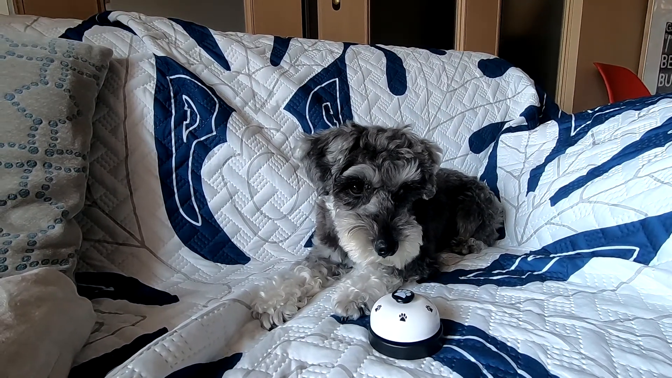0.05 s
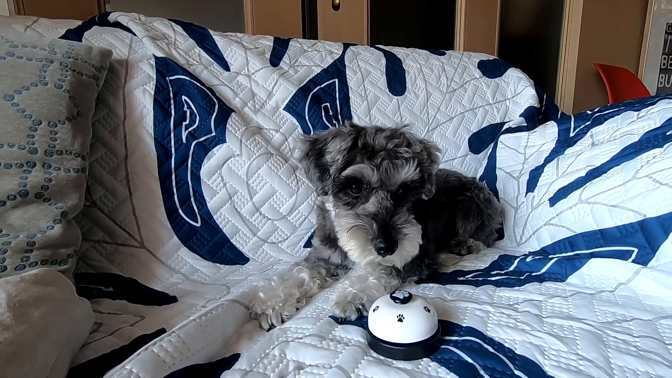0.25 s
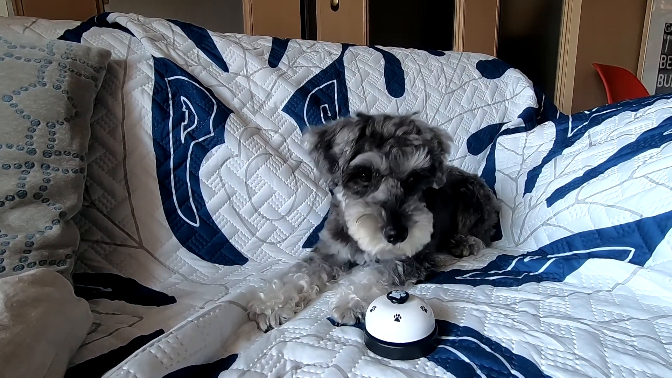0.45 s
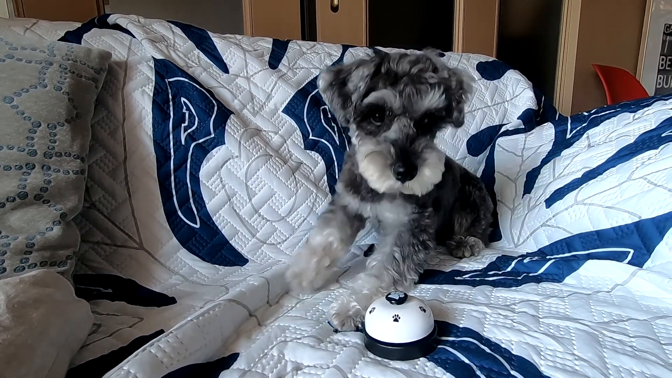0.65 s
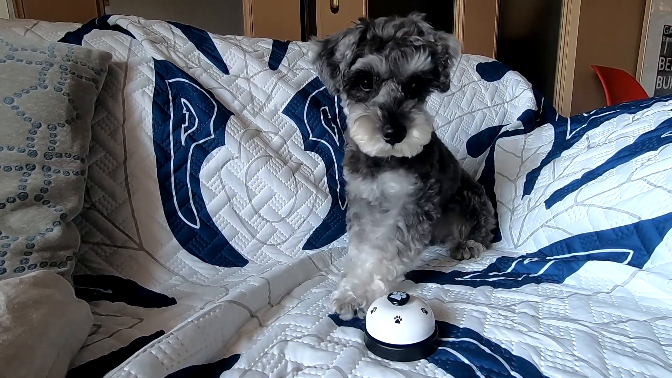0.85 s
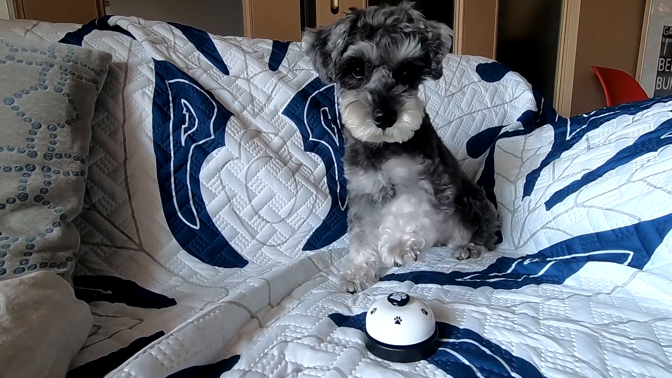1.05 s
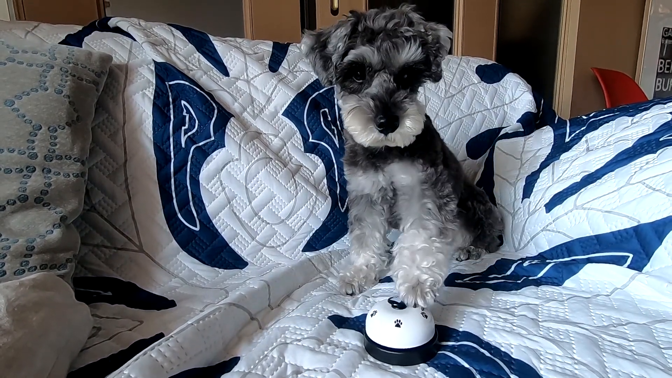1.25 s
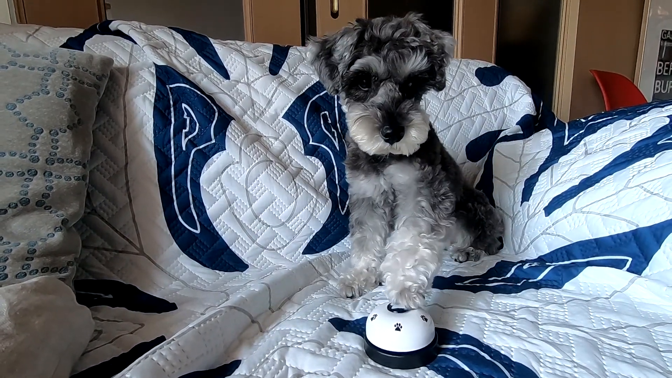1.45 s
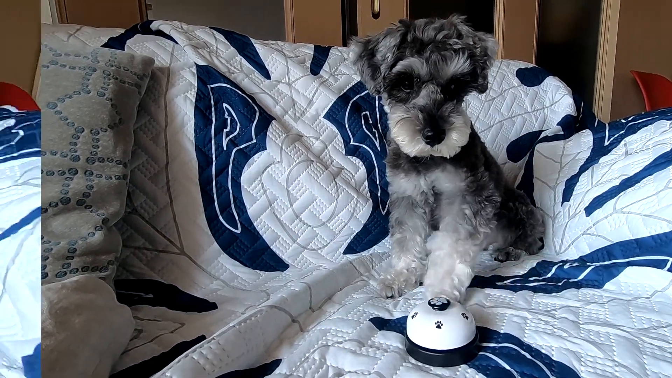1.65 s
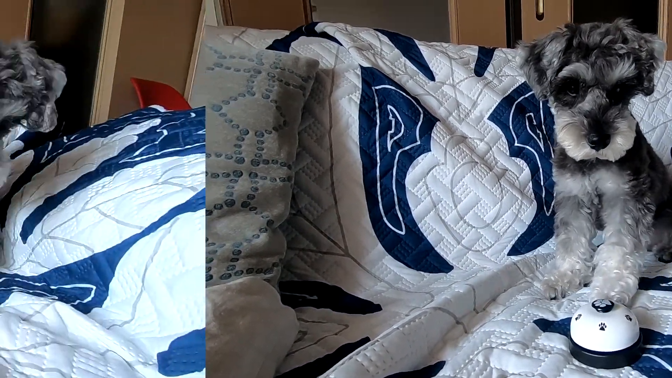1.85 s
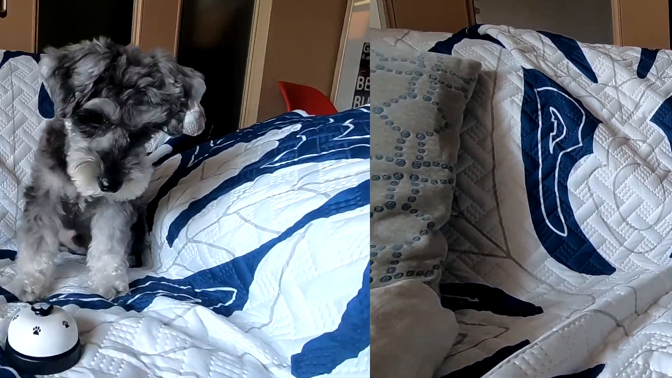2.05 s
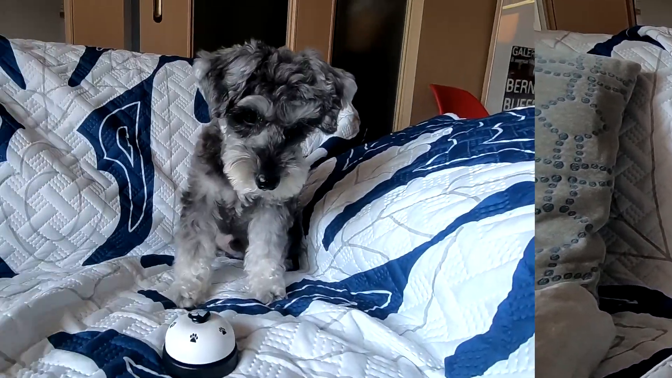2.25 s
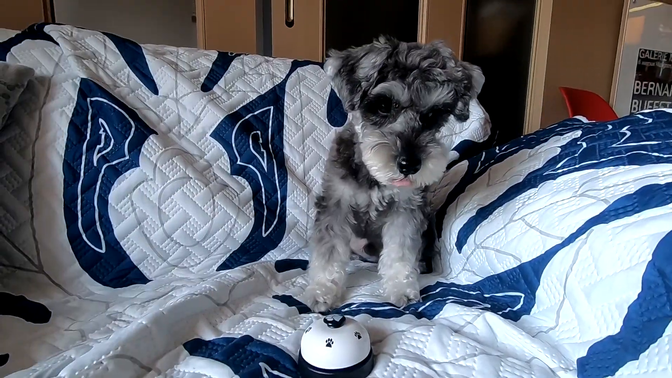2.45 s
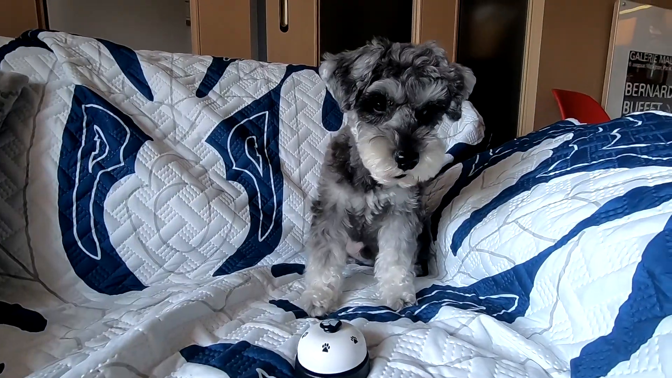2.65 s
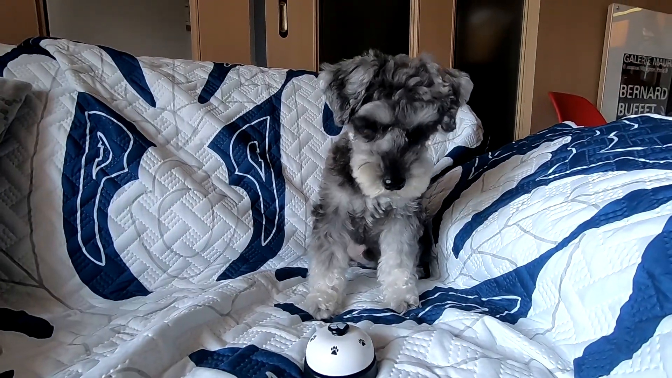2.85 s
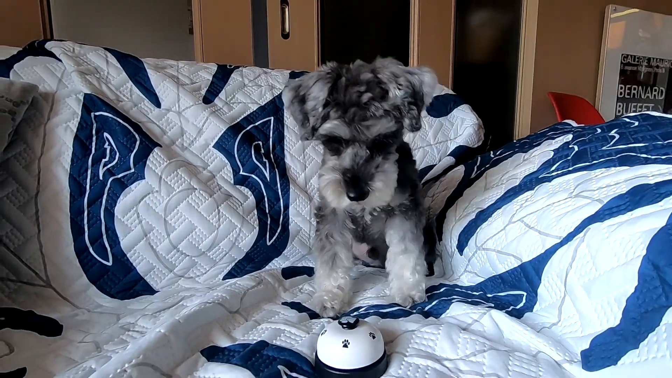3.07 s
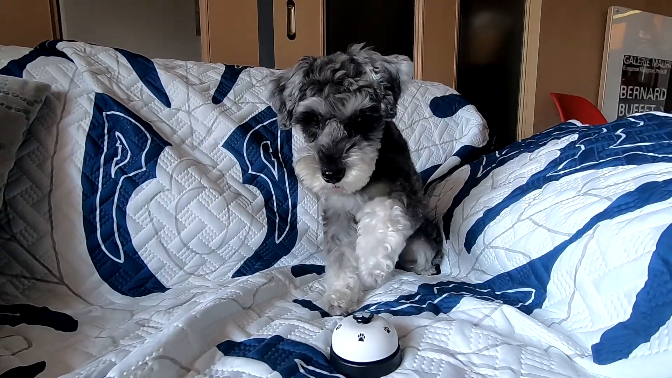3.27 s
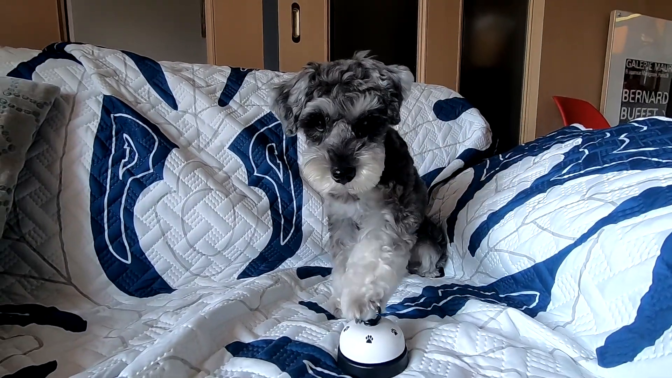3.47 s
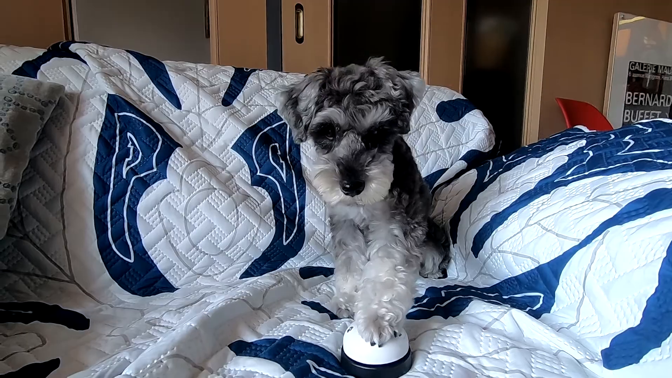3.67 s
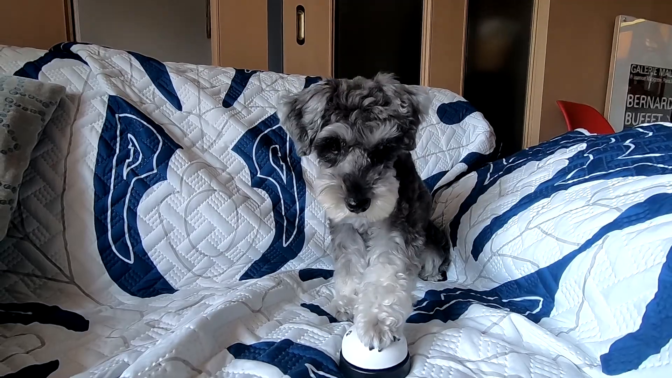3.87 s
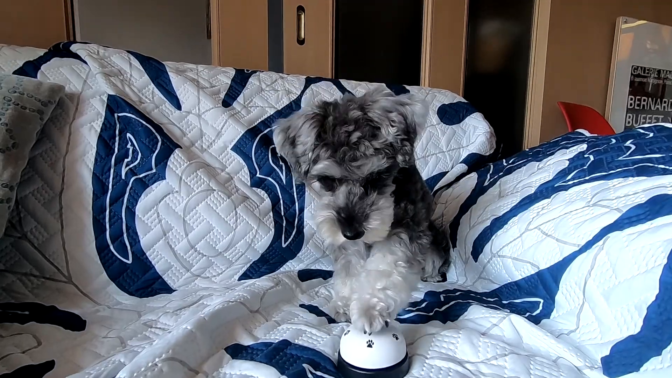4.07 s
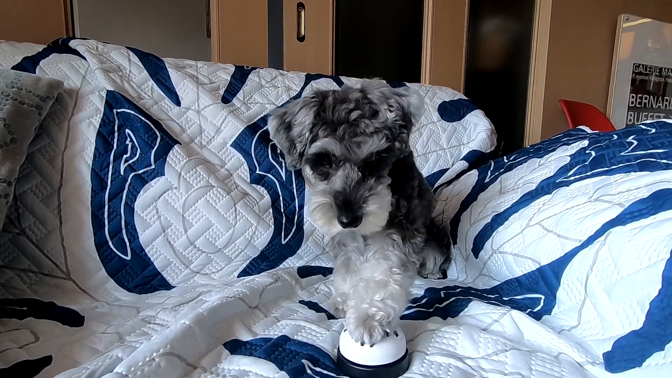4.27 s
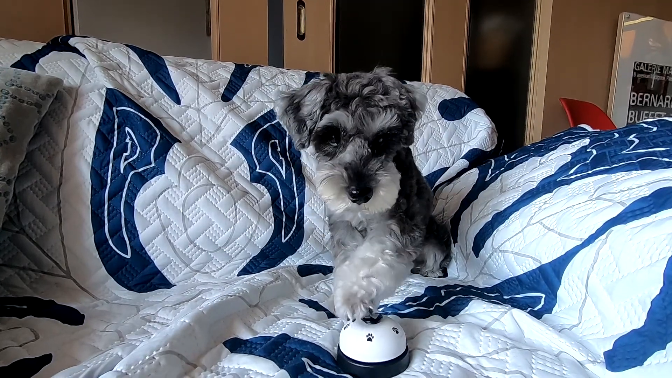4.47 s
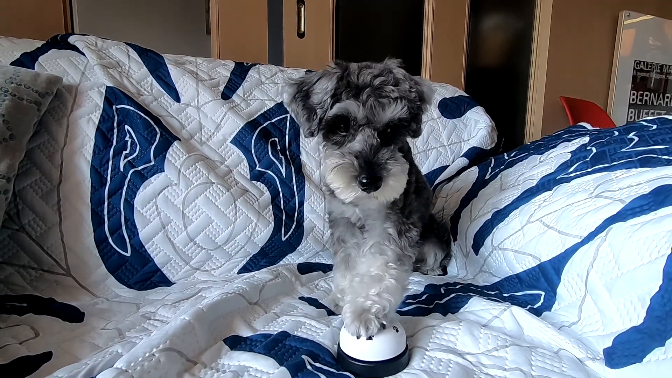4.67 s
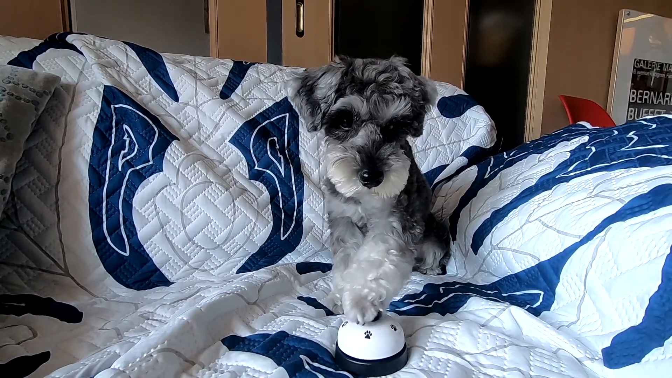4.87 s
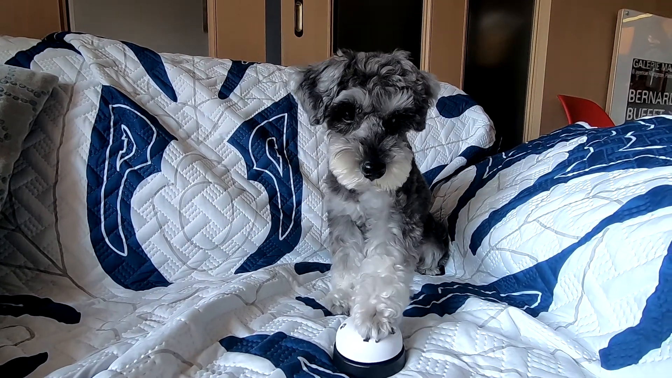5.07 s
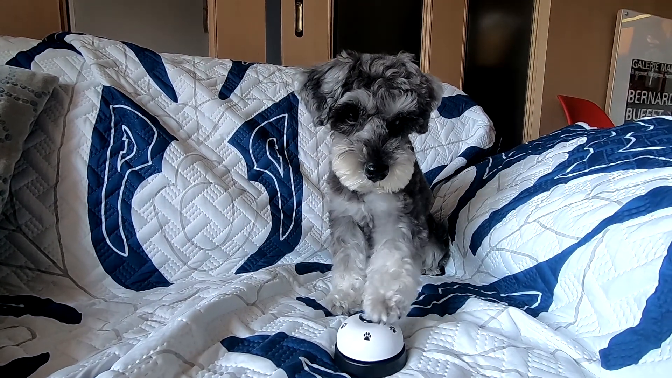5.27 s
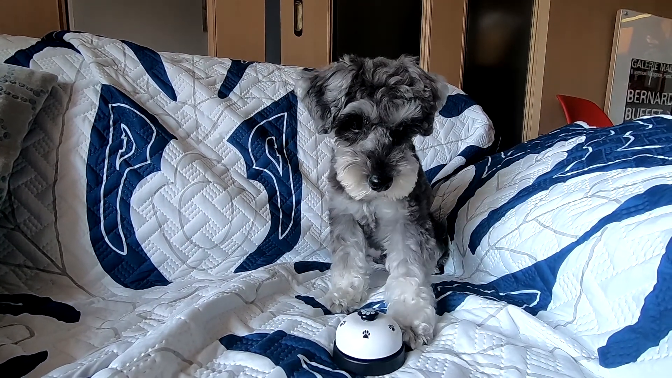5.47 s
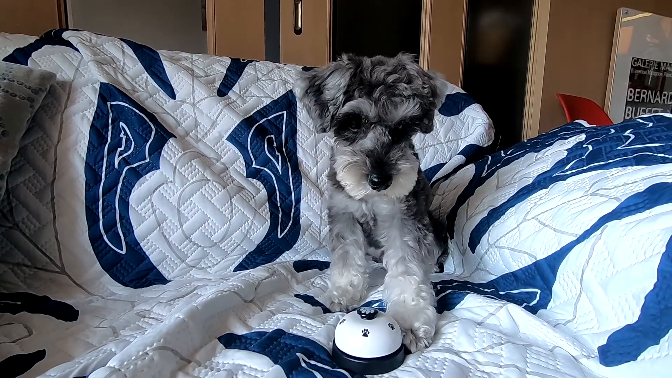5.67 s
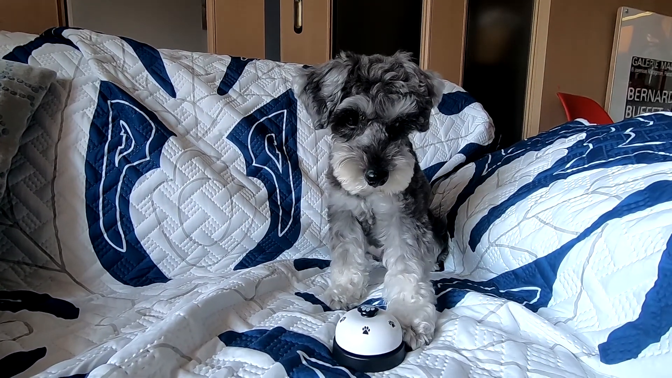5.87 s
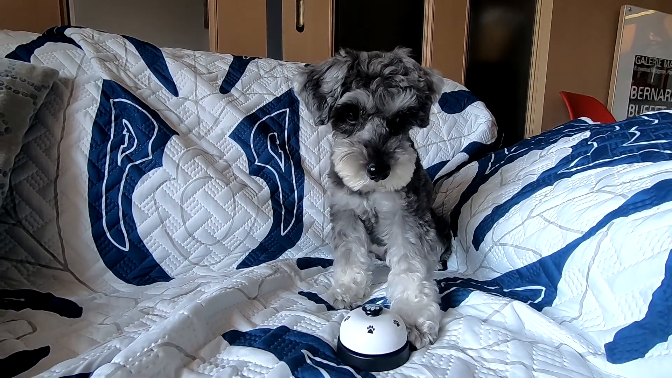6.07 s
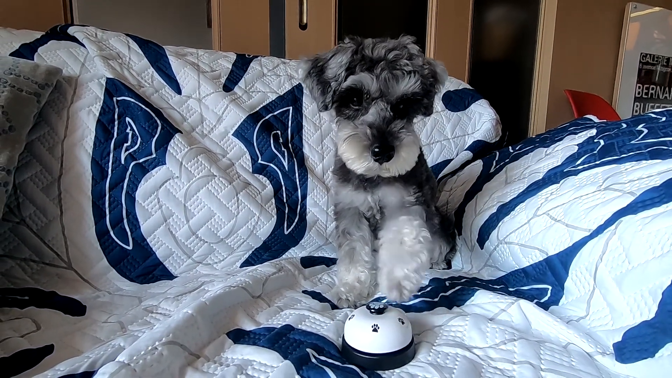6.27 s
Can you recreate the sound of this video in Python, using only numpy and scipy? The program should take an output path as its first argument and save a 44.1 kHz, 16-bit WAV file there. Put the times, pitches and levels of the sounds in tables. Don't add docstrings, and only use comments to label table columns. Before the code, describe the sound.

A quiet furnished room hums low, with faint hiss and soft air rumbles. For the first second, a dog's paw rustles over quilted cloth, with tiny claw ticks, a soft cushion thud near 0.4 s and an almost inaudible earlier ring. At about 1.2 s the plunger scrapes and clicks and a small steel bell gives a high, clear ding, unevenly damped by the paw. A very faint distant bird chirps twice near 1.7-1.9 s. A weaker ding at 2.1 s is choked and ends around 2.5 s as the scene changes. Light rustles and thuds follow. Brighter, firmer dings come at 3.6, 4.2, 4.6 and 5.0 s, each with plunger rattle and soft padded impacts. At 5.44 s the released plunger snaps sharply with claw ticks and a thud; the last ring thins away until 6.3 s amid faint rustling. Close stereo microphone, very short echoes.

```python
import sys
import numpy as np
from scipy import signal
from scipy.fft import rfft, irfft, next_fast_len
from scipy.io import wavfile

SR = 44100
rng = np.random.default_rng(int(sys.argv[2]) if len(sys.argv) > 2 else 0)


def store_wav(level_fs):
    pcm = np.round(np.clip(np.atleast_2d(level_fs), -1, 1) * 32767)
    wavfile.write(sys.argv[1], SR, pcm.T.astype(np.int16))


def rack_gain(trim_db):
    fader = np.asarray(trim_db, float)
    return 10 ** (fader / 20)


N = 279020
SECOND_TAKE_S = 2.5

# freq_hz, level_db_per_hz
RUMBLE_SPECTRUM = [(11, -31), (18, -1.5), (40, 1), (56, -3), (75, -17), (110, -15.5), (140, -49.5),
                   (240, -120)]
DRONE_SPECTRUM = [(71, -50), (120, -17), (140, 1), (160, 1.5), (202, -1.5), (240, -9.5), (320, -45.5),
                  (550, -120)]
HISS_SPECTRUM = [(150, -33.5), (260, -0.5), (720, -7.5), (1040, -15), (1560, -14), (2280, -25),
                 (6590, -37.5), (15000, -51.5)]
# freq_hz, level_db_per_hz
CLOTH_SPECTRUM = [(400, -12), (900, -0.5), (2020, 0), (5500, -11), (8400, -20), (10200, -18),
                  (12500, -28.5), (15000, -50)]
# freq_hz, likeness_0_to_1
LIKENESS = [(60, 0.75), (180, 0.79), (540, 0.23), (1630, 0), (4910, 0.39), (14800, -0.0)]
# time_s, level_db
HUM_LEVEL = [(0.0, -58.5), (1.62, -60), (2.2, -67), (2.8, -58.5), (4.12, -61.5), (6.33, -61.5)]
# centre_s, half_length_s, level_db
GUSTS = [(.05, 0.11, -56.5), (.45, 0.076, -59.5), (.85, 0.19, -53), (1.37, 0.084, -51), (1.74, 0.082, -61),
         (2.6, 0.076, -64), (2.93, 0.031, -51), (3.6, 0.73, -69.5), (4.68, 0.045, -55.5),
         (4.98, 0.026, -56), (5.26, 0.032, -63), (5.5, 0.039, -55.5), (5.95, 0.07, -55.5)]

# freq_hz, attack_s, take1_left_right_db, take1_left_lead_rad, take2_left_right_db, take2_left_lead_rad
PRIME = (3733.5, .004, 0, -.3, 0, -.12)
HUM = (1417.6, .006, -7.5, .62, -4.0, -.88)
HUM_TWIN = (1473.55, .006, -3.5, -.55, -1.5, -.5)
THIRD = (6614.5, .008, 0, 0, 0, 0)
FOURTH = (9959.5, .003, 0, 0, 0, 0)
FIFTH = (14040, .003, 3.0, 1.4, -3.5, 1.8)
# start_s, twin_over_hum_db, twin_change_db_per_s, beat_start_turns, fifth_under_fourth_db
BLOWS = [
    (0, 2.5, 0.5, 0.27, -25),
    (1.1734, 5, -5.5, .65, -16),
    (2.1348, 7.5, -8, 0.78, -15.5),
    (3.6168, -29.5, 1.5, 0.12, -15.5),
    (4.187, -24, -4, 0.091, -17),
    (4.5892, -29.5, -7.5, .1, -16.5),
    (4.97, -29, -9.5, .1, -16.5),
]
# level_db, decay_db_per_s, grip_after_s, grip_loss_db, grip_time_s
GRIPS = [(-72.5, 3.5, 0.6, 2.5, 0.039), (-46, 17, .45, 0, 0.063), (-58, 55, .33, 23, 0.028),
         (-36.5, 31, 0.3, 33, 0.071), (-40, 16.5, 0.16, 10.5, 0.019), (-41, 21.5, 0.17, 25.5, 0.039),
         (-38.5, 17, 0.23, 12, 0.019)]
# time_s, left_db, right_db
EARLIER_RING = [(0, -90, -84), (.2, -95, -91), (1.17, -120, -120)]
FIRST_RING = [(1.185, -30.5, -26.1), (1.245, -28, -28.8), (1.3, -31.5, -33), (1.461, -46.0, -43.0),
              (1.533, -40.9, -43.0), (1.671, -47.7, -45.3), (1.89, -56, -56), (1.971, -65.3, -59.2),
              (2.109, -65.3, -65.5)]
MIDDLE_RINGS = [
    [(2.147, -34.2, -31.8), (2.195, -33.8, -36.3), (2.249, -37.5, -43.7), (2.303, -46.5, -51.2),
     (2.393, -58.5, -53.8), (2.429, -60.9, -59.3), (2.465, -68.6, -70.7), (2.483, -78.8, -82.1)],
    [(3.628, -25.8, -24.2), (3.652, -24.2, -22.1), (3.7, -25.0, -23.4), (3.754, -28.3, -26.4),
     (3.826, -43.4, -41.7), (3.856, -47.4, -45.6), (4.132, -61.1, -60.4), (4.156, -60.5, -60.5)],
    [(4.199, -25.8, -24.5), (4.223, -23.5, -22.3), (4.295, -25.8, -24.6), (4.391, -36.3, -36.3),
     (4.439, -38.9, -38.9), (4.493, -37.8, -36.8), (4.541, -42.6, -41.8), (4.565, -42.0, -41.8)],
    [(4.601, -25.2, -24.7), (4.637, -24.6, -23.6), (4.691, -27.3, -26.5), (4.715, -29.4, -28.6),
     (4.793, -38.7, -38.7), (4.859, -43.4, -43.6), (4.937, -45.7, -45.0), (4.949, -45.2, -44.3)],
]
LAST_RING = [(4.982, -26.9, -26.5), (5.006, -25, -24.6), (5.078, -26.4, -25.9), (5.216, -46.0, -46.2),
             (5.36, -43.3, -43.4), (5.402, -51.5, -51.6), (5.54, -50.8, -50.2), (5.786, -67.0, -65.5),
             (6.27, -79, -79)]
# time_s, left_db, right_db, left_lead_rad
THIRDS = [
    [(0, -120, -120, 0)],
    [(1.185, -39.9, -25.1, 1.0), (1.221, -33.4, -22.9, 1.0), (1.305, -42.5, -29.5, 1.5),
     (1.431, -69.1, -42.4, 0.6), (1.515, -65.4, -46.2, -0.4), (1.731, -73.9, -59.5, 0.8),
     (1.881, -95.0, -69.8, -0.4), (1.965, -95.0, -78.4, 5.7), (2.109, -91.7, -85.8, 6.5)],
    [(2.147, -49.1, -39.4, -1.1), (2.159, -54.7, -40.1, -0.9), (2.177, -52.5, -41.5, 0.3),
     (2.237, -59.9, -46.4, 0.3), (2.261, -67.1, -49.8, 0.3), (2.297, -72.2, -55.9, 0.1),
     (2.399, -80.6, -66.0, -0.8), (2.447, -89.4, -76.6, -0.8), (2.471, -95.0, -87.9, -0.1)],
    [(3.628, -48.0, -42.3, 2.6), (3.646, -41.9, -37.0, 3.1), (3.7, -43.3, -39.5, 4.7),
     (3.766, -47.6, -47.2, 4.5), (3.802, -53.3, -63.5, 5.6), (3.814, -54.9, -62.1, 6.9),
     (3.94, -67.0, -73.9, 6.1), (3.97, -69.8, -81.6, 8.6), (4.156, -74.9, -71.1, 11.3)],
    [(4.199, -39.9, -40.9, -2.4), (4.211, -37.9, -35.8, -2.7), (4.289, -47.3, -39.3, -2.0),
     (4.319, -60.2, -41.7, -1.7), (4.331, -79.6, -43.1, -3.5), (4.355, -61.9, -46.2, 0.8),
     (4.487, -56.5, -60.8, 0.9), (4.535, -61.1, -75.3, -1.3), (4.565, -61.3, -67.8, -2.1)],
    [(4.601, -36.4, -36.1, -2.7), (4.613, -35.9, -32.0, -3.0), (4.625, -39.5, -36.0, -3.0),
     (4.679, -42.9, -40.4, -2.9), (4.691, -50.3, -40.5, -2.9), (4.787, -63.5, -49.2, -4.6),
     (4.871, -59.4, -59.7, -5.8), (4.919, -61.0, -64.7, -6.0), (4.949, -60.6, -64.4, -6.0)],
    [(4.982, -37.3, -43.7, 2.7), (4.994, -35.7, -36.0, 2.8), (5.042, -39.7, -37.1, 3.5),
     (5.114, -55.8, -43.3, 3.3), (5.15, -80.6, -48.2, 3.8), (5.162, -66.3, -49.8, 5.6),
     (5.36, -63.2, -64.7, 5.4), (5.624, -87.0, -77.4, 2.1), (5.702, -89.7, -86.6, 0.7)],
]
FOURTHS = [
    [(0, -120, -120, 0)],
    [(1.185, -45.1, -34.5, -1.8), (1.215, -36.7, -40.5, -1.4), (1.239, -39.2, -48.8, -0.8),
     (1.263, -45.3, -46.1, -0.8), (1.311, -49.7, -53.5, -1.2), (1.353, -63.8, -64.9, -0.3),
     (1.569, -92.0, -85.2, -1.5)],
    [(2.147, -56.0, -48.4, -0.8), (2.159, -51.4, -52.9, -0.8), (2.177, -50.6, -58.2, -0.7),
     (2.189, -53.2, -59.1, -0.2), (2.243, -60.1, -61.1, -0.6), (2.285, -69.6, -74.0, -0.0),
     (2.315, -77.8, -78.3, 0.1)],
    [(3.628, -48.5, -37.4, -1.5), (3.647, -48.5, -37, 0), (3.69, -45.5, -51, 3.1), (3.722, -53, -50, 4.1),
     (3.75, -63, -55, 6.3), (3.81, -70, -66, 9.4), (3.89, -80, -92, 15.5), (3.95, -95, -87, 15)],
    [(4.199, -44.1, -36.5, -1.9), (4.217, -41.9, -40.4, -1.3), (4.259, -52.5, -48.7, -1.7),
     (4.301, -56.0, -50.4, -2.0), (4.355, -68.8, -66.5, -1.4), (4.547, -92.0, -90.0, -2.0),
     (4.565, -92.0, -82.0, -1.8)],
    [(4.601, -40.5, -33.9, -1.7), (4.619, -35.9, -34.3, -1.7), (4.667, -45.1, -45.0, -1.6),
     (4.709, -50.8, -46.2, -2.0), (4.847, -77.9, -73.1, -2.3), (4.895, -83.1, -74.4, -1.6),
     (4.949, -91.2, -85.4, -2.3)],
    [(4.982, -46.3, -37.3, -1.5), (5.006, -42.5, -40.4, -1.7), (5.036, -50.6, -51.0, -1.6),
     (5.096, -69.1, -54.7, -1.6), (5.132, -77.6, -73.0, -1.2), (5.156, -77.8, -67.9, -0.8),
     (5.294, -92.0, -82.9, -1.8)],
]

# start_s, peak_db, pitch_hz
CLAWS = [(.3115, -67, 8430), (0.4098, -75, 9440), (.4699, -67, 3940), (.5947, -63, 4500),
         (.7423, -66, 4670), (.754, -67, 4700), (.8371, -80, 10020), (0.8491, -65, 4500), (.87, -61, 4690),
         (.88, -66, 4620), (.8805, -84, 11000), (1.2001, -40.5, 11200), (1.201, -52, 13070),
         (1.586, -68.5, 12280), (1.594, -58.5, 10820), (1.5942, -58.5, 7370), (1.604, -61, 10480),
         (2.326, -62, 11200), (2.338, -64, 11040), (2.372, -66.5, 7500), (2.62, -73, 4570),
         (2.6396, -75, 4550), (2.6664, -70, 4120), (3.2634, -59, 4650), (3.28, -69, 4460),
         (3.3047, -62, 6290), (3.3258, -62, 1870), (3.327, -71, 9670), (3.3315, -62, 4930),
         (3.369, -59.5, 1650), (3.391, -57, 1470), (3.3888, -67.5, 5500), (3.597, -43.5, 2997),
         (3.6102, -49.5, 11540), (3.611, -32.5, 5090), (3.6505, -44.5, 4990), (4.176, -48, 2225),
         (4.1822, -31, 5040), (4.1905, -41.5, 5140), (4.585, -33, 4994), (4.5927, -40.5, 5270),
         (4.5858, -54, 11450), (4.612, -44.5, 4954), (4.9652, -36, 4865), (2.5025, -53, 1510),
         (5.33, -55, 5100), (5.356, -69, 9000), (5.363, -62.5, 10070), (5.413, -52, 1510),
         (5.4166, -64, 5060), (5.4413, -39, 6040), (5.441, -43.5, 9760), (5.4412, -39, 2204),
         (5.45, -49, 7950), (5.4522, -46, 9980), (5.453, -50, 6060), (5.462, -49.5, 7750)]
# start_s, peak_db, pitch_hz
THUDS = [(0.398, -48, 162), (1.179, -39.5, 237), (1.206, -39.5, 176), (2.499, -64, 154),
         (2.923, -46.5, 149), (3.9399, -39.5, 152), (4.191, -43.5, 162.7), (4.598, -40, 175.7),
         (4.982, -38.5, 151), (5.447, -39, 201), (5.4555, -37.5, 119)]
# centre_s, half_length_s, level_db, brightness_db
STROKES = [(0.438, 0.04, -71.5, -15), (0.555, 0.062, -68.5, -1), (0.76, 0.032, -73.5, 1),
           (0.862, 0.028, -70, 0), (1.06, 0.11, -81.5, -4), (1.613, 0.022, -80, 17), (2.36, 0.038, -76, 11),
           (2.515, .04, -78.5, -11), (2.666, .05, -77.5, 6), (2.957, 0.029, -80.5, -9),
           (3.03, 0.055, -83, 7), (3.243, 0.051, -70.5, -12), (3.336, 0.024, -77.5, 14.5),
           (3.405, 0.034, -76.5, -5), (3.52, 0.063, -77.5, -11), (3.963, .03, -81, -1),
           (4.13, 0.042, -78, -3), (4.48, 0.023, -76, 3), (4.58, .015, -72, -6), (5.237, .025, -71.5, -5),
           (5.365, .035, -68, 6.5), (5.436, .012, -61, 3), (5.517, 0.058, -74, 10),
           (6.25, 0.05, -73, -17.5)]
# centre_s, half_length_s, level_db
SHIFTS = [(.42, 0.043, -68.5), (1.5, .08, -71), (2.48, 0.05, -68), (2.94, 0.026, -81), (3.3, 0.058, -70),
          (3.5, 0.09, -72.5), (6.24, 0.028, -63.5)]

# freq_hz, level_db, t60_s
BODY = [(1592, -1, 0.0077), (1740, -12.5, 0.014), (2267, -11.5, 0.0086), (2615, -2.5, 0.011),
        (3130, -2.5, 0.01), (3336, -1, 0.013)]
SHELL = [(4000, -4, 0.013), (4893, -1, 0.0096), (5500, -5.5, .008), (6290, -7, .01)]
TICK = [(7230, -2, 0.0066), (7480, 0, 0.0063), (9000, -1, 0.0052), (10365, 1, 0.012), (11200, -7.5, 0.0034),
        (12830, -12.5, .004)]
THUMP = [(320, -10, 0.024), (624, -3, 0.02), (750, -2, 0.013), (1200, -5.5, 0.022)]
# start_s, body_db, shell_over_body_db, thump_db
TOUCHES = [(.7273, -69.5, 1, -77), (0.837, -66, -5, -61), (0.872, -59, -6, -62), (1.159, -50, -2.5, -57.5),
           (1.184, -25, -15.5, -55.5), (1.228, -32.5, -20, -55), (1.33, -46, -41, -71),
           (1.4936, -53, -20, -74), (1.5859, -50.5, -8, -76), (1.5927, -52.5, -1.5, -74),
           (2.4682, -63, -20, -54), (2.5045, -68, -30, -60.5), (2.616, -66, -14, -57),
           (2.649, -66, -8, -50), (2.9323, -62.5, -5, -48), (3.252, -57.5, -24, -71),
           (3.264, -59.5, -4, -61), (3.3892, -60, -12, -63), (3.687, -50, -20.5, -51),
           (3.9435, -67, -13, -55.5), (4.1064, -59, -20.5, -63), (4.1471, -54, -3, -67.5),
           (4.465, -48, -19.5, -65), (4.98, -33.5, -24.5, -49.5), (5.2172, -60.5, -12, -74.5),
           (5.332, -45, -19.5, -65), (5.3613, -52.5, -15, -56), (5.416, -50.5, -24, -50),
           (5.441, -36.5, -4, -51), (6.2172, -61.5, -12, -58)]
# start_s, tick_db
SNAPS = [(2.3264, -67)]
# after_blow_s, body_db, shell_db, tick_db, thump_db
PLUNGER_RUN = [
    [(-.005, -12.5, -10, -23.5, -20.5), (.0012, 1.5, -13.5, -20.5, -16.5), (.0049, -2, -12.5, -20.5, -20)],
    [(-.0053, -3.5, -10, -30.5, -27), (.0006, 0, -23.5, -24.5, -22.5), (.006, -6, -15, -29, -20.5)],
]
# body_db, shell_db, tick_db, thump_db
PAW_DOWN = [(0, -1.5, -10, -18.5), (0, -17, -39.5, -7.5)]
REBOUND = [(-2.5, -23, -22.5, -17), (-2, -15.5, -35, -17.5)]
# strength_db, paw_down_db, rebound_db
PRESSES = [(-27.5, -47, -26), (-36, -57, -36.5), (-31, -39.5, -25.5), (-28, -45.5, -25), (-26, -59, -33),
           (-30.5, -44.5, -28.5)]
# paw_down_before_s, rebound_after_s
PRESS_TIMES = [(.0185, .028), (.0195, .0295), (.0192, .0338), (.017, .0285), (.0334, .022), (.0145, .0293)]
SLIDE_DB = [-45, -46.5, -55.5, -50.5, -45.5, -54.5]
SLIDE_S = [.017, .012, .009, .019, .016, .016]
# body_db, shell_db, tick_db, thump_db
SLIDE_MIX = (4.5, 1, -12.5, -25)
# start_s, length_s, from_hz, to_hz, level_db
CHIRPS = [(1.695, 0.06, 5150, 5850, -94), (1.795, .125, 5400, 4650, -92)]


def read_curve(rows, t):
    s, *columns = np.transpose(rows)
    return [np.interp(t, s, column) for column in columns]


def at_hz(points, hz):
    point_hz, value = np.transpose(points)
    return np.interp(np.log(hz + 1), np.log(point_hz), value)


def cut(x, hz, kind, order=4):
    return signal.sosfilt(signal.butter(order, hz, kind, fs=SR, output="sos"), x)


def swells(rows, t):
    return sum(rack_gain(db) * np.exp(-((t - s) / half_s) ** 2 / 2) for s, half_s, db in rows)


def smooth_step(t, at_s, time_s):
    return (1 + np.tanh((t - at_s) / time_s / 2)) / 2


def flutter(t, depth_db):
    knots = rng.standard_normal((2, 400))
    return rack_gain(depth_db * np.array([np.interp(t * 45, np.arange(400), k) for k in knots]))


def coloured(spectrum, crackle=0.):
    size = next_fast_len(N)
    grains = rng.random(size) < 900 / SR
    grain = 1 + crackle * grains * np.minimum(rng.exponential(1, size), 3)
    mid, side = rfft(rng.standard_normal((2, size)) * grain)
    hz = np.arange(len(mid)) * SR / size
    alike = np.clip(at_hz(LIKENESS, hz) + .1, 0, 1)
    pair = np.sqrt(1 + alike) * mid + np.sqrt(1 - alike) * side * [[1], [-1]]
    pair = irfft(pair * rack_gain(at_hz(spectrum, hz)) * (hz > 10), size)[:, :N]
    return pair / np.std(pair.mean(axis=0))


def room_tone(t):
    hum_db, = read_curve(HUM_LEVEL, t)
    lumps = flutter(t / 5.4, 2)[0]
    air = (rack_gain(-70) + swells(GUSTS, t)) * lumps * coloured(RUMBLE_SPECTRUM)
    drone = rack_gain(hum_db + 1.9) * coloured(DRONE_SPECTRUM)
    hiss = rack_gain(hum_db - 4.5) * coloured(HISS_SPECTRUM)
    return air + drone + hiss


def at_ports(curve, t):
    left_db, right_db, *more = read_curve(curve, t)
    mean_db = 10 * np.log10((rack_gain(2 * left_db) + rack_gain(2 * right_db)) / 2)
    tail_db = 130 * np.maximum(t - curve[-1][0], 0)
    return mean_db - tail_db, left_db - right_db, *more


def partial(mode, t, level_db, second_take, pan_db=0., turns=0., swing_rad=0.):
    hz, attack_s, first_db, first_lead, second_db, second_lead = mode
    lean_db, lead_rad = (second_db, second_lead) if second_take else (first_db, first_lead)
    left = rack_gain(lean_db + pan_db) + np.zeros(len(t))
    sides = np.array([left, np.ones(len(t))]) / np.sqrt((1 + left ** 2) / 2)
    swell = (1 - .2 * np.exp(-t / attack_s)) * (1 - np.exp(-t / .0003))
    wobble = flutter(t, .5 * (hz / 10000) ** 2)
    phase = 2 * np.pi * (hz * t + turns)
    sines = np.sin([phase + lead_rad + swing_rad, phase])
    return np.sqrt(2) * rack_gain(level_db) * swell * sides * wobble * sines


def bell():
    out = np.zeros((2, N))
    ends = [blow[0] for blow in BLOWS[1:]] + [N / SR]
    primes = [EARLIER_RING, FIRST_RING, *MIDDLE_RINGS, LAST_RING]
    for blow, end, grip, *curves in zip(BLOWS, ends, GRIPS, primes, THIRDS, FOURTHS):
        start, twin_db, twin_db_per_s, turns, fifth_db = blow
        second = start > SECOND_TAKE_S
        if start < SECOND_TAKE_S < end:
            end = SECOND_TAKE_S
        i, j = round(start * SR), round(end * SR)
        t = np.arange(j - i) / SR
        prime, third, fourth = (at_ports(curve, start + t) for curve in curves)
        prime_db, prime_pan = prime
        third_db, third_pan, third_swing = third
        fourth_db, fourth_pan, fourth_swing = fourth
        hum_db, decay_db_per_s, grip_s, grip_db, grip_time_s = grip
        hum_db = hum_db - decay_db_per_s * t - grip_db * smooth_step(t, grip_s, grip_time_s)
        ringing = partial(PRIME, t, prime_db + .23, second, prime_pan)
        ringing += partial(HUM, t, hum_db, second)
        ringing += partial(HUM_TWIN, t, hum_db + twin_db + twin_db_per_s * t, second, turns=turns)
        ringing += partial(THIRD, t, third_db + .4, second, third_pan, swing_rad=third_swing)
        ringing += partial(FOURTH, t, fourth_db + .53, second, fourth_pan, swing_rad=fourth_swing)
        ringing += partial(FIFTH, t, fourth_db + fifth_db - 17 * t, second)
        out[:, i:j] = ringing
    return out


def claws():
    out = np.zeros(N)
    offset = np.arange(400)
    s, peak_db, hz = np.transpose(CLAWS)[:, :, None]
    t = offset / SR
    wander = np.cumsum(rng.normal(0, 0.16, (len(s), len(t))), axis=1)
    envelope = (1 - np.exp(-t / 0.00017)) * np.exp(-t / 0.0017)
    pings = rack_gain(peak_db + 6.5) * envelope * np.sin(2 * np.pi * hz * t + wander)
    np.add.at(out, np.round(s * SR).astype(int) + offset, pings)
    return out


def room_echoes(x):
    low_t60_s, top_t60_s = 0.16, 0.2
    t = np.arange(SR // 2) / SR
    noise = rng.standard_normal((2, len(t))) * np.clip(t / 0.0045, 0, 1)
    low = cut(noise, 8500, "low", order=2)
    echoes = low * rack_gain(-60 * t / low_t60_s) + (noise - low) * rack_gain(-60 * t / top_t60_s)
    echoes /= np.sqrt(np.sum(echoes ** 2) / 2)
    return signal.fftconvolve(x[None], echoes, axes=1)[:, :N]


def thuds():
    out = np.zeros(N)
    t = np.arange(SR // 8) / SR
    envelope = (1 - np.exp(-t / 0.0013)) * np.exp(-t / 0.014)
    for s, peak_db, hz in THUDS:
        i = round(s * SR)
        out[i:i + len(t)] += rack_gain(peak_db - 3.0) * np.sin(2 * np.pi * hz * t) * envelope
    return out


def rustle(t):
    cloth = coloured(CLOTH_SPECTRUM, crackle=2.5)
    stroke, bright = np.zeros((2, N))
    for s, half_s, level_db, bright_db in STROKES:
        near = slice(*np.searchsorted(t, [s - 4 * half_s, s + 4 * half_s]))
        swell = swells([(s, half_s, level_db + 1.5)], t[near])
        stroke[near] += swell
        bright[near] += swell * rack_gain(bright_db - 1.0)
    weight = swells(SHIFTS, t) * cut(cloth, 2700, "low")
    return weight + stroke * cut(cloth, 8500, "low") + bright * cut(cloth, 7300, "high")


def contact_rows():
    rows = []
    for s, db, shell_db, thump_db in TOUCHES:
        rows.append((s, db, db + shell_db, db + shell_db - 20.5, thump_db))
    for s, db in SNAPS:
        rows.append((s + .0003, db + 6, db - 14, db, db - 22))
    for (s, *_), (db, down_db, rebound_db), (before_s, after_s) in zip(BLOWS[1:], PRESSES, PRESS_TIMES):
        take = int(s > SECOND_TAKE_S)
        rows += [(s + delay_s, *np.add(levels, db)) for delay_s, *levels in PLUNGER_RUN[take]]
        rows.append((s - before_s, *np.add(PAW_DOWN[take], down_db)))
        rows.append((s + after_s, *np.add(REBOUND[take], rebound_db)))
    for (s, *_), length_s, db in zip(BLOWS[1:], SLIDE_S, SLIDE_DB):
        for share in (np.arange(7) + rng.random(7)) / 7:
            rows.append((s - length_s * share, *np.add(SLIDE_MIX, db - 4.9 * share)))
    return np.array(rows)


def ring(clicks, hz, t60_s):
    r, w = rack_gain(-60 / (t60_s * SR)), 2 * np.pi * hz / SR
    return signal.lfilter([0, np.sin(w)], [1, -2 * r * np.cos(w), r * r], clicks + 1e-18)


def contacts():
    table, out = contact_rows(), np.zeros(N)
    offset = np.arange(128)
    at = np.round(table[:, :1] * SR).astype(int) + offset
    shape = offset * np.exp(-offset / (0.00037 * SR))
    shape /= shape.max()
    groups_db = (-1.4, 3, 7.5, 2.5)
    for modes, group_db, level_db in zip((BODY, SHELL, TICK, THUMP), groups_db, table[:, 1:].T):
        group = np.zeros(N)
        for hz, mode_db, t60_s in modes:
            scrape = rng.standard_normal(at.shape) * shape
            push = np.abs(scrape @ np.exp(-2j * np.pi * hz / SR * offset))
            strength = rack_gain(level_db + group_db + mode_db) / (push + 0.39)
            clicks = np.zeros(N)
            np.add.at(clicks, at, scrape * strength[:, None])
            group += ring(clicks, hz, t60_s)
        out += cut(group, [.75 * modes[0][0], 1.25 * modes[-1][0]], "band", order=3)
    return out


def bird():
    out = np.zeros(N)
    for s, length_s, from_hz, to_hz, level_db in CHIRPS:
        i, size = round(s * SR), round(length_s * SR)
        hz = from_hz + (to_hz - from_hz) * np.linspace(0, 1, size) ** .7
        phase = 2 * np.pi * np.cumsum(hz + rng.normal(0, 900, size)) / SR
        out[i:i + size] = rack_gain(level_db + 5) * np.hanning(size) ** .5 * np.sin(phase)
    return out


def release():
    start_s, level_db, decay_s = 5.4411, -32, 0.00066
    out, t = np.zeros(N), np.arange(SR // 100) / SR
    i = round(start_s * SR)
    out[i:i + len(t)] = rack_gain(level_db) * rng.standard_normal(len(t)) * np.exp(-t / decay_s)
    return cut(out, [1000, 11000], "band", order=1)


def scene():
    t = np.arange(N) / SR
    pings, clatter, crack = claws(), contacts(), release()
    direct = (clatter + crack + pings) * rack_gain([[-1], [1]])
    echoes = room_echoes(clatter + .4 * crack + .64 * pings)
    return room_tone(t) + bell() + direct + echoes + thuds() + rustle(t) + bird()


def low_pass(x):
    return signal.sosfilt(signal.butter(12, 14900, fs=SR, output="sos"), x)


def record(dry):
    mix = cut(dry, 14600, "low", order=6)
    return low_pass(mix)


dry = scene()
out = record(dry)
store_wav(out)
```